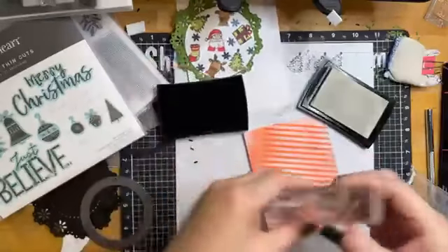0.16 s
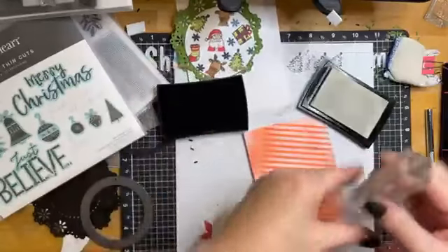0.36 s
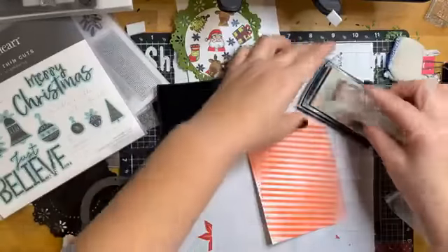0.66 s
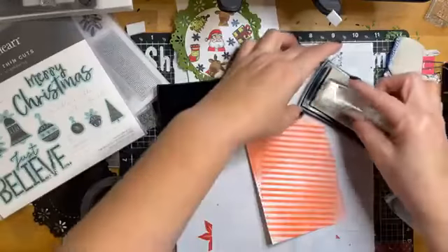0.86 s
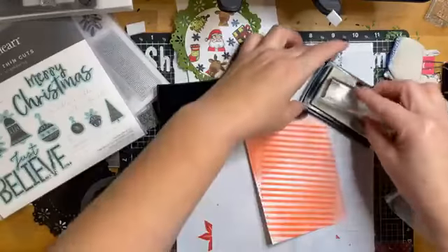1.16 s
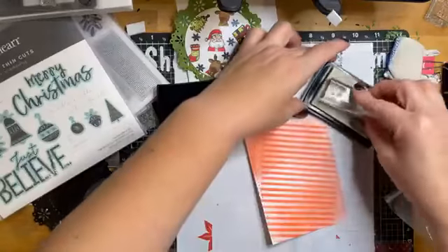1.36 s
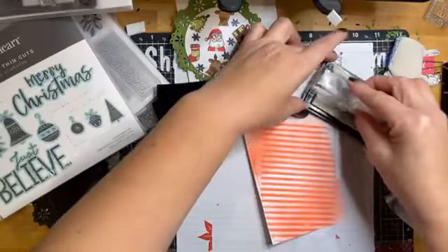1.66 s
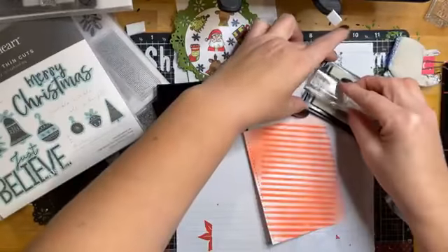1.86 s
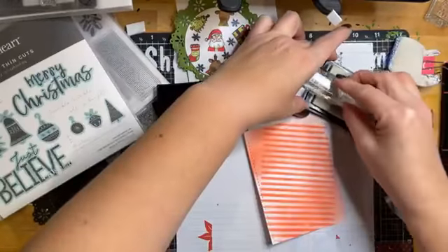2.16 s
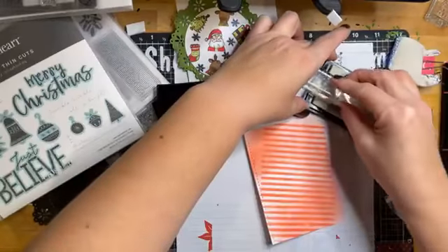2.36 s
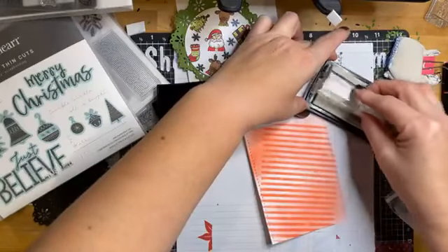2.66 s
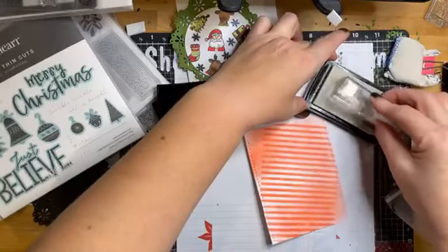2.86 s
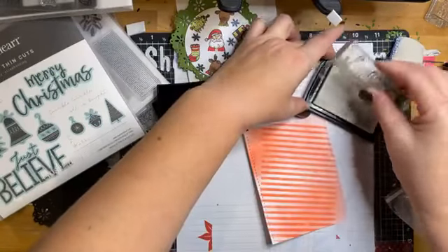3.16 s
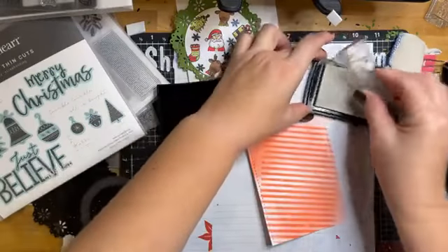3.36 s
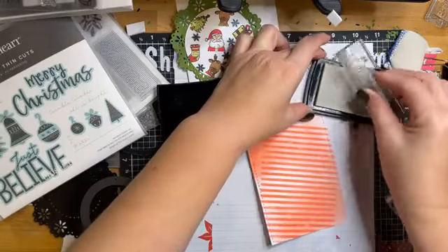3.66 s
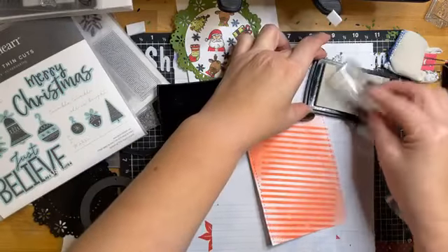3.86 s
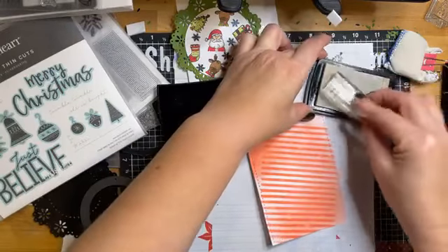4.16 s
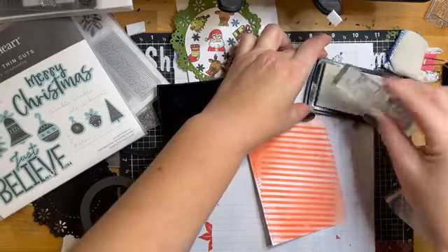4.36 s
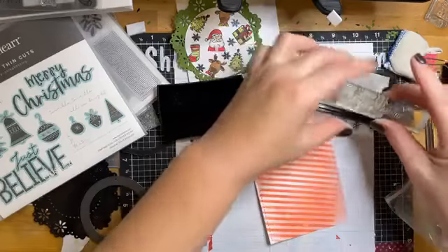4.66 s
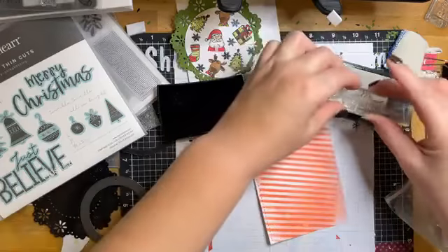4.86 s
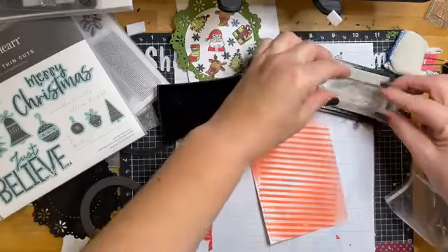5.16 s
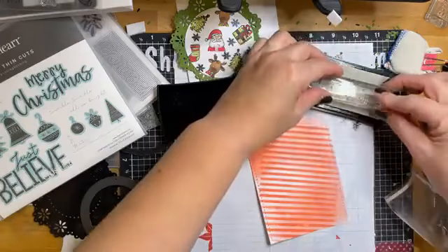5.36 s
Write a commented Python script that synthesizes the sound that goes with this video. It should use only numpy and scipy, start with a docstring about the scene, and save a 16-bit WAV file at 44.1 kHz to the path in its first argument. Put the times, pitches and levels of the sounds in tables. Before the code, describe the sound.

Heard from above a craft table in a small room, a sharp plastic snap comes first, followed by a short lull. Then a stamp block is tapped unevenly on an ink pad, mixing bright clacks on the hollow case with dull thumps through the felt and faint rubbing. The tapping stops, leaving one soft last press over a faint electrical hum and room noise.

```python
"""A clear plastic stamp block being inked on a pad, heard from one microphone above a craft table.
The block snaps once in the hands, then is dabbed and rocked on the pad: its edge clacks on the hollow
case, each press through the felt thumps the table top, and skin and inky rubber slide softly.
The room is small, with a short tail; a low mains hum and faint room noise lie underneath."""
import sys
import numpy as np
from scipy import signal
from scipy.fft import rfft, irfft
from scipy.io import wavfile
from scipy.ndimage import uniform_filter1d

SR = 44100
rng = np.random.default_rng(int(sys.argv[2]) if len(sys.argv) > 2 else 0)


def int16_out(signal):
    """Quantize to a 16-bit WAV file."""
    q = np.round(np.clip(np.atleast_2d(signal).T, -1, 1) * 32767)
    wavfile.write(sys.argv[1], SR, q.astype(np.int16))


N = 243640
SIZE = 32768  # samples in one hit or room response
HZ, TIME = np.fft.rfftfreq(SIZE, 1 / SR) + 1e-3, np.arange(SIZE) / SR

# Room noise at the microphone. Each row: frequency in Hz, relative level in dB.
ROOM_NOISE_COLOUR = [(20, -29), (50, -14), (85, -12.5), (120, -2), (160, -10), (300, -16.5), (500, -22.5),
                     (1100, -33), (3500, -28.5), (4800, -41.5), (8000, -43.5), (16000, -58)]
# The small room's tail. Each row: frequency in Hz, t60 in seconds.
ROOM_DECAY = [(100, 0.13), (500, 0.23), (1400, 0.26), (3700, 0.26), (9000, 0.24), (15000, 0.15)]
# Skin and rubber sliding. Each row: frequency in Hz, relative level in dB.
RUB_SPECTRUM = [(100, 2.5), (300, 14.5), (700, 8.5), (2000, 8.5), (5000, 0), (9000, -12), (16000, -21.5)]
# Slides in the fingers or over the felt. Each row: start in seconds, length in seconds, level in dB.
BLOCK_SLIDES = [(-.06, 0.11, -60.5), (1.652, 0.15, -53.5), (2.01, 0.26, -87.5), (3.39, .36, -68),
                (4.462, 0.19, -59.5), (4.603, 0.15, -65)]
# The fingers shift their grip. Each row: start in seconds, level in dB, pitch in Hz.
GRIP_SHIFTS = [(0.004, -28, 232), (0.032, -22, 216), (0.069, -27, 307)]
# The crack of the snap. Each row: frequency in Hz, relative level in dB.
SNAP_COLOUR = [(45, -17), (100, -5), (230, 6), (620, -2), (1900, -4.5), (2400, 1.5), (3700, 0.5),
               (4100, -10.5), (5000, -3), (6100, -5), (6600, -19), (8500, -14), (12000, -21), (16000, -27)]
# The block's ring after the snap. Each row: frequency in Hz, t60 in seconds, relative level in dB.
SNAP_MODES = [(450, 0.06, -11.5), (850, 0.074, -11.5), (1650, 0.019, -16), (2450, 0.013, -13),
              (3445, 0.14, -5), (3765, 0.057, -10), (5670, 0.057, -17), (7140, 0.05, -21),
              (8380, 0.022, -19)]
# Table top modes. Each row: frequency in Hz, t60 in seconds, relative level in dB when pushed
# through the felt, relative level in dB when struck on the case.
TABLE_MODES = [(84.4, 0.35, 19.5, 1), (115.8, 0.085, 15.5, 9.5), (126.9, 0.35, 16, 13),
               (174.4, 0.042, -7.5, -1.5), (178.1, 0.22, -3, 4.5), (244, 0.29, -0.5, 0),
               (318.6, 0.16, 0, -2), (379, 0.46, -0.5, -4), (446.3, 0.15, -21, -1.5)]
# The rubber bottoms out on the felt. Each row: start in seconds, thump level in dB, hardness as
# the top of the push in Hz.
FELT_PRESSES = [(1.786, -12, 330), (1.873, -2, 252), (1.929, -13.5, 254), (2.1992, -10, 465),
                (2.3536, -13.5, 414), (2.4566, -18.5, 620), (2.506, -29, 300), (2.671, -6.5, 303),
                (2.8389, -1.5, 473), (3.001, -5.5, 520), (3.132, -6.5, 510), (3.6233, -16, 540),
                (3.9547, 4, 286), (4.12, -3, 358), (4.979, -103, 195), (5.428, -26.5, 246)]
# Bare plastic on plastic. Each row: frequency in Hz, relative level in dB.
CONTACT_COLOUR = [(100, -23.5), (230, 3.5), (400, -2.5), (490, -7), (620, -3), (900, 0), (1700, -6),
                  (3000, -8.5), (6300, -10.5), (9400, -15), (10800, -22.5), (16000, -26)]
# Resonances of block and case. Each row: frequency in Hz, width in Hz, dB against the bare contact.
PLASTIC_RESONANCES = [(1176, 93, -2.5), (1373, 62, 4), (1563, 16.4, 6.5), (1647, 41, 9), (1920, 190, 3),
                      (2494, 40, 5.5), (3856, 370, 7), (5230, 200, 2), (6750, 300, 2)]
# The block's edge meets the case; the first, faint row is a fingernail ticking on the case. Each row: start in
# seconds, level in dB, treble tilt in dB per octave.
EDGE_CLACKS = [(0.644, -42, -1), (1.6968, 1.5, 1.5), (1.8664, -7, 1.2), (2.1468, -25, -5.5),
               (2.313, -26.5, -5), (2.616, -14.5, -1), (2.763, -16, -2), (3.0626, -24.5, -2),
               (3.2461, -8, -1), (3.7715, -4, 0.3), (3.9083, -.5, .5), (4.0379, -12.5, .5),
               (4.2235, -3.5, 1), (4.3736, -15, 1), (4.5372, -5.5, 1)]

SNAP_S, SNAP_DB = 0.1206, 0.5
PAD_SPOTS = 3  # places on the pad that the contacts take in turn


def gain_of(db):
    """Decibels to amplitude."""
    return 10 ** (np.asarray(db) / 20)


def unit(x):
    """Scales a sound to an energy of one."""
    return x / np.sqrt(np.sum(x ** 2) + 1e-30)


def curve_at(points, hz):
    """Reads rows of frequency and value on a log-frequency axis."""
    f, value = np.transpose(points)
    return np.interp(np.log(hz + 1), np.log(f + 1), value)


def add(mix, s, sound):
    """Lays a sound into the mix at s seconds."""
    part = mix[max(round(s * SR), 0):][:len(sound)]
    part += sound[:len(part)]


def coloured(x, db):
    """Causal filter with the given gain over HZ."""
    log_gain = np.log(gain_of(np.r_[db, db[-2:0:-1]]))
    response = np.exp(np.conj(signal.hilbert(log_gain)))[:len(HZ)]
    return irfft(rfft(x, SIZE) * response)


def shaped(x, colour):
    """Gives a full-length noise a spectrum and an rms of one."""
    gain = gain_of(curve_at(colour, np.fft.rfftfreq(N, 1 / SR)))
    return unit(irfft(rfft(x) * gain, N)) * np.sqrt(N)


def flattened(x, bins):
    """Evens out the broad bumps in the spectrum of a random burst."""
    power = uniform_filter1d(abs(rfft(x, SIZE)) ** 2, bins)
    return unit(coloured(x, -10 * np.log10(abs(power) + 1e-9)))


def room_noise(level_db=-67):
    """Faint, steady room tone, mostly bass."""
    return gain_of(level_db) * shaped(rng.standard_normal(N), ROOM_NOISE_COLOUR)


def mains_hum(hz=118.2, level_db=-69.5, waver=0.072):
    """One low tone whose level wavers slowly."""
    t = np.arange(N) / SR
    drift = np.interp(t, np.linspace(0, t[-1], 30), rng.standard_normal(30))
    return gain_of(level_db) * np.sqrt(2) * np.sin(2 * np.pi * hz * t) * (1 + waver * drift)


def room(x, tail_db, echo_db, bounce_db, echo_s=0.0118, bounce_s=0.00077, gap_s=0.0105):
    """Paths to the microphone: direct, table bounce, scatter off clutter, ceiling echo, dense tail."""
    reflections = flattened(rng.standard_normal(SIZE) * (rng.random(SIZE) < 0.12), bins=400)
    hz, t, spectra = signal.stft(reflections, SR, nperseg=256)
    decay = gain_of(-60 * t / curve_at(ROOM_DECAY, hz)[:, None])
    tail = signal.istft(spectra * decay, SR, nperseg=256)[1][:SIZE]
    early_lift = gain_of(3 * np.exp(-TIME / 0.018))
    tail = flattened(tail * early_lift, bins=30)
    direct = np.zeros(SIZE)
    direct[0] = 1
    add(direct, bounce_s, gain_of([bounce_db]))
    clutter = gain_of(tail_db - 13) * unit(rng.standard_normal(SIZE) * (TIME < gap_s))
    response = unit(direct) + clutter
    add(response, echo_s, gain_of([echo_db]))
    add(response, gap_s, gain_of(tail_db) * tail)
    return signal.fftconvolve(x, unit(response))[:N]


def sliding(onset_s=0.0096, settle_s=0.19):
    """How strongly the block rubs: a dying skid after each clack and the snap, an arch for each slide."""
    t, power = np.arange(N) / SR, np.zeros(N)
    for s, db, *_ in EDGE_CLACKS + [(SNAP_S, SNAP_DB)]:
        age = np.maximum(t - s, 0)
        skid = np.minimum(age / onset_s, 1) * np.exp(-age / settle_s)
        power += (gain_of(-58 + 0.61 * db) * skid) ** 2  # harder hits skid louder
    for s, length, db in BLOCK_SLIDES:
        arch = np.sin(np.pi * np.clip((t - s) / length, 0, 1))
        power += (gain_of(db) * arch) ** 2
    return np.sqrt(power)


def rubbing(grain_db=3.0):
    """Fine, uneven grains of skin and inky rubber sliding."""
    roughness = np.repeat(np.minimum(rng.exponential(1, N), 5), 64)[:N]
    grains = rng.standard_normal(N) * gain_of(grain_db * roughness)
    return sliding() * shaped(grains, RUB_SPECTRUM)


def knock(hz, swell_s):
    """A dead, hollow knock that swells and dies within a few cycles."""
    age = TIME / swell_s
    swell = (age * np.exp(-age)) ** 6
    return unit(np.gradient(swell * np.sin(2 * np.pi * hz * (TIME - swell_s))))


def grip_bumps():
    """The block bumps in the fingers as they shift their grip."""
    out = np.zeros(N)
    for s, db, hz in GRIP_SHIFTS:
        add(out, s, gain_of(db) * knock(hz, swell_s=0.003))
    return out


def crack(colour_db, chatter_s, rise_s, uneven_db=4.5):
    """Hard faces chatter against each other for a few milliseconds, in uneven micro-impacts."""
    impacts = gain_of(uneven_db * np.repeat(rng.standard_normal(SIZE // 16), 16))
    envelope = np.exp(-TIME / chatter_s) * (1 - np.exp(-TIME / rise_s))
    burst = impacts * rng.standard_normal(SIZE) * envelope
    return unit(coloured(flattened(burst, bins=120), colour_db))


def block_ring(detune=0.0016):
    """The block's modes ring as dying sines; the grip shifts their pitch a little."""
    out = np.zeros(SIZE)
    for hz, t60, db in SNAP_MODES:
        held_hz = hz * (1 + detune * rng.standard_normal())
        mode = gain_of(-60 * TIME / t60) * np.sin(2 * np.pi * held_hz * TIME)
        out += gain_of(db) * unit(mode)
    return unit(out)


def snap(ring_db=-4):
    """The block snaps in the hands, clear of the table: a crack and a short ring."""
    out = np.zeros(N)
    hit = crack(curve_at(SNAP_COLOUR, HZ), chatter_s=0.0022, rise_s=0.00093)
    hit += gain_of(ring_db) * block_ring()
    add(out, SNAP_S, gain_of(SNAP_DB) * unit(hit))
    return out


def table_wave(place, hard_hz, travel_s, low_hz=60, mat_hz=580):
    """Bending waves in the table top: the high ones arrive first, so each thump falls in pitch."""
    modes = 0
    for k, (hz, t60, *db) in enumerate(TABLE_MODES):
        width = np.log(1000) / (np.pi * t60)
        modes += (-1) ** k * gain_of(db[place]) / (1 + 1j * (HZ ** 2 - hz ** 2) / (width * HZ))
    push = (1j * HZ / (low_hz + 1j * HZ)) ** 2 / (1 + 1j * HZ / hard_hz) ** 2
    # travel_s is the delay at 100 Hz; it shrinks with the square root of frequency
    dispersion = np.exp(-4j * np.pi * travel_s * np.sqrt(100 * HZ))
    mat = 1 / (1 + (HZ / mat_hz) ** 8)  # the cutting mat swallows the short waves
    return unit(irfft(modes * push * dispersion * mat)[:SIZE // 2])


def table_thumps():
    """The table answers each press on the felt and each blow on the case."""
    out = np.zeros(N)
    felt, case = range(2)
    for s, db, hard_hz in FELT_PRESSES:
        add(out, s, gain_of(db) * table_wave(felt, hard_hz, travel_s=0.00556))
    blow = table_wave(case, hard_hz=535, travel_s=0.00856)
    for s, db, _ in EDGE_CLACKS:
        add(out, s, gain_of(-0.04 + 0.81 * db) * blow)
    return out


def case_knocks():
    """The hollow case sounds under each clack, and takes a larger share of the hard ones."""
    out = np.zeros(N)
    for s, db, _ in EDGE_CLACKS:
        add(out, s, gain_of(-4 + 1.14 * db) * knock(hz=320, swell_s=0.00515))
    return out


def plastic_contact(tilt_db, chatter_s, ring_db, place_db=2.0):
    """A crack through the resonances of block and case, whose shares vary with the place struck."""
    shares_db = place_db * rng.standard_normal(len(PLASTIC_RESONANCES))
    peaks = sum(gain_of(ring_db + peak_db + share_db) ** 2 / (1 + (2 * (HZ - hz) / width) ** 2)
                for (hz, width, peak_db), share_db in zip(PLASTIC_RESONANCES, shares_db))
    octaves = np.log2(np.maximum(HZ, 500) / 2000)
    colour_db = curve_at(CONTACT_COLOUR, HZ) + tilt_db * octaves + 10 * np.log10(1 + peaks)
    return crack(colour_db, chatter_s, rise_s=0.00062)


def press_ticks(firm_hz=486, firm_db=-23, db_per_octave=15.5):
    """Each press ticks, the louder the harder it lands; one track for each spot on the pad."""
    spots = np.zeros((PAD_SPOTS, N))
    tick = plastic_contact(tilt_db=-3, chatter_s=0.0044, ring_db=-1.5)
    for k, (s, db, hard_hz) in enumerate(FELT_PRESSES):
        tick_db = db + firm_db + db_per_octave * np.log2(hard_hz / firm_hz)
        add(spots[k % PAD_SPOTS], s, gain_of(tick_db) * tick)
    return spots


def edge_clacks():
    """The rocking block's edge strikes the case, and a fingernail ticks on it once; one track for each spot on
    the pad."""
    spots = np.zeros((PAD_SPOTS, N))
    for k, (s, db, tilt_db) in enumerate(EDGE_CLACKS):
        clack = plastic_contact(tilt_db, chatter_s=0.0028, ring_db=-0.1)
        add(spots[k % PAD_SPOTS], s, gain_of(db) * clack)
    return spots


def scene():
    """One microphone above the table; each spot has its own echoes, and the thumps arrive directly."""
    spots = edge_clacks() + press_ticks()
    pad = sum(room(x, tail_db=4.0, echo_db=-2.5, bounce_db=-8.5) for x in [*spots, rubbing()])
    hands = room(snap(), tail_db=4.5, echo_db=-10.5, bounce_db=-29, echo_s=0.01)
    hollow = room(case_knocks() + grip_bumps(), tail_db=-2.0, echo_db=-18, bounce_db=-14, echo_s=0.01303)
    return (pad + hands + hollow + table_thumps() + mains_hum() + room_noise())[None]


def record(dry):
    """The recorder's band limit cuts the treble above 16.1 kHz."""
    low_pass = signal.firwin(511, 16100, window=("kaiser", 9), fs=SR)
    return signal.oaconvolve(dry, low_pass[None], "same")


dry = scene()
out = record(dry)
int16_out(out)
```